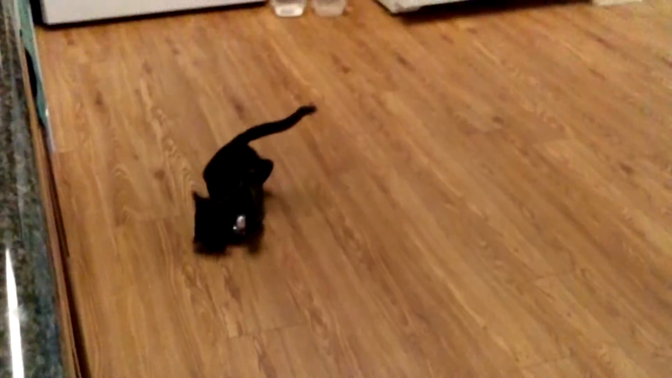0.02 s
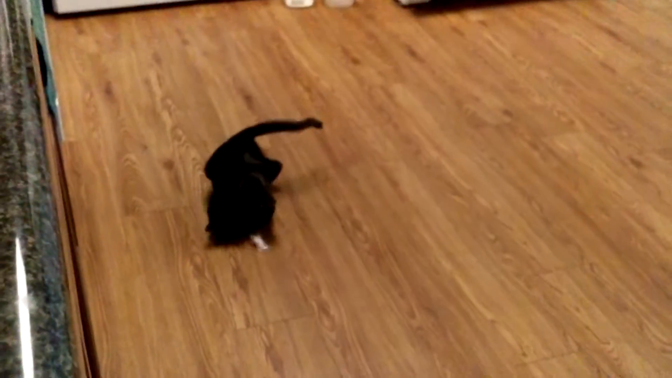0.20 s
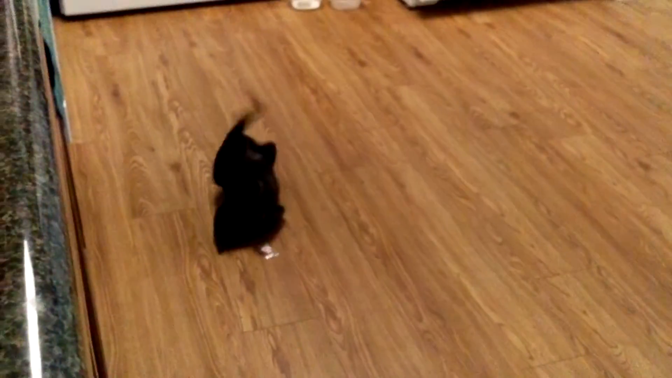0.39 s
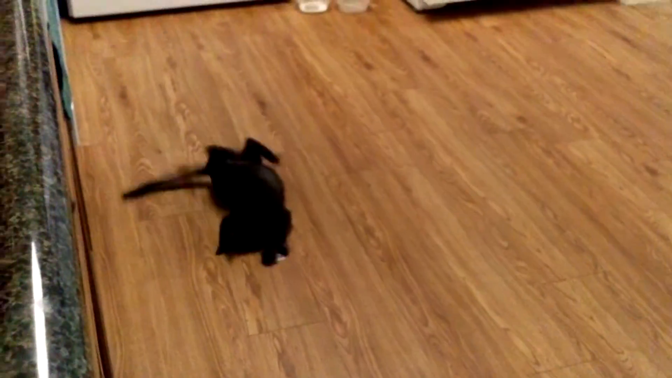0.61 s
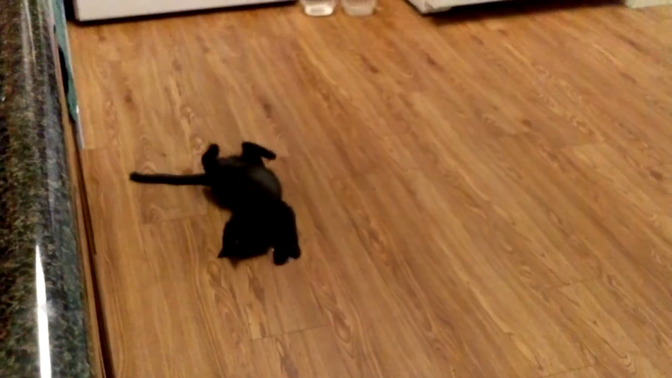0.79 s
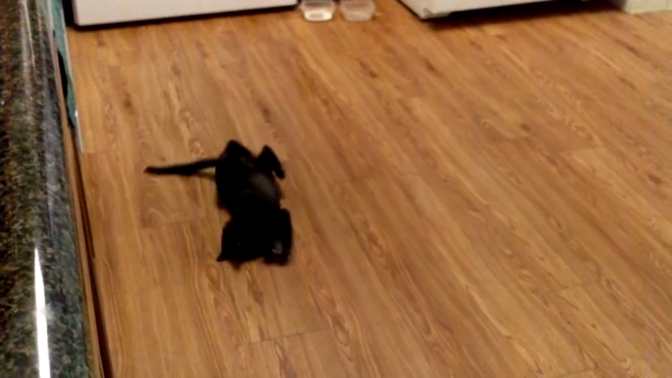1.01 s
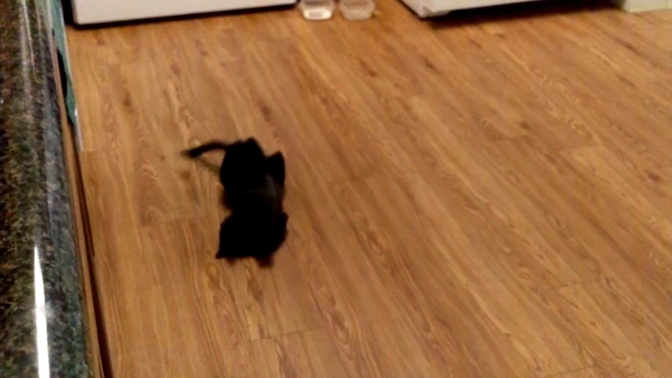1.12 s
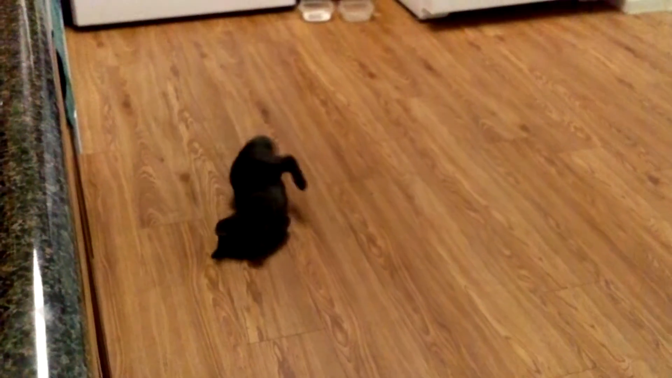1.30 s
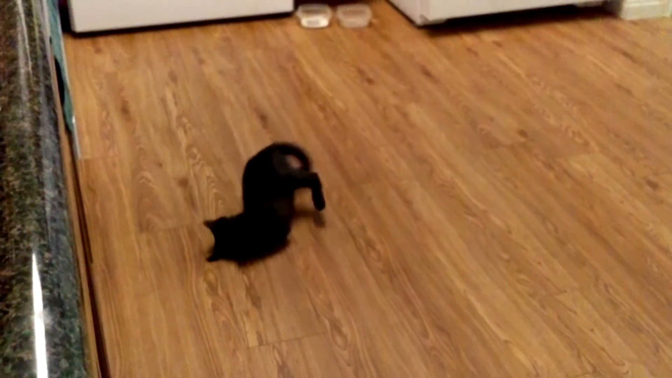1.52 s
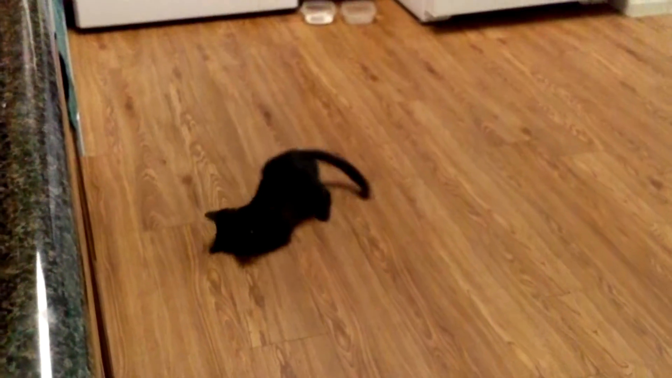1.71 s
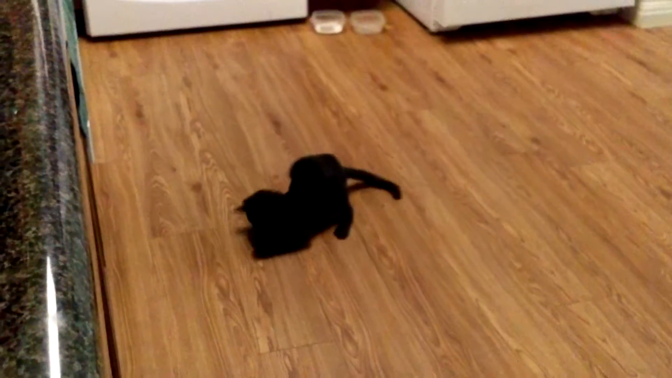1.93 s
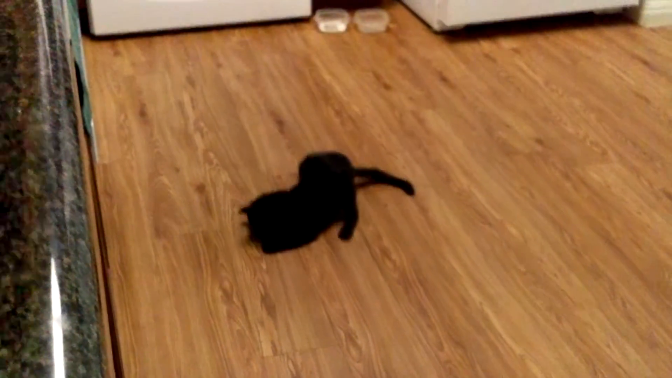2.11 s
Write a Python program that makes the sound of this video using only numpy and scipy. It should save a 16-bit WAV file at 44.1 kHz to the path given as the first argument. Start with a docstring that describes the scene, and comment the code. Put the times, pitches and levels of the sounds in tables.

```python
"""Wrapped sweet on a kitchen floor

Bare, echoing kitchen: a cat bats a hard sweet in a plastic wrapper over laminate, heard near and direct. The
sweet knocks as bright clicks over decaying modes; clicks of lower pitch are the cat's paws tapping. The wrapper
snaps as short clicks and crinkles in bursts of tiny random grains; hard walls add a noise tail. A fridge-like
murmur of shaped noise lies beneath; the microphone rounds peaks and dulls the top."""
import sys
import numpy as np
from scipy import signal
from scipy.fft import rfft, irfft
from scipy.io import wavfile
from scipy.ndimage import uniform_filter1d

SR = 44100
rng = np.random.default_rng(int(sys.argv[2]) if len(sys.argv) > 2 else 0)


def dump(signal):
    """Clip the signal to [-1, 1] and save it as 16-bit WAV at the path in sys.argv[1]."""
    limited = np.clip(np.atleast_2d(signal).T, -1, 1)
    pcm = np.round(limited * 32767).astype(np.int16)
    wavfile.write(sys.argv[1], SR, pcm)


N = 97020  # samples, 2.2 s

# murmur of the house, relative spectrum: f/Hz, density/dB (per Hz)
MURMUR_SPECTRUM = [(15, -30), (25, -10), (158, -7.5), (204, -7), (249, -4.5), (374, -5.5), (619, -6),
                   (928, -8.5), (1030, -4.5), (1140, -12.5), (1540, -8.5), (2420, -22), (10500, -12),
                   (13600, -42), (22000, -120)]
MURMUR_DB, MURMUR_FLICKER_DB = -54.5, 2.
# wavering tones in the murmur: f/Hz, width/Hz, level/dB
MURMUR_TONES = [(291.4, 47, -65), (634.4, 22.5, -70), (102.8, 24, -74.5)]

# crumpling of the wrapper, one table per burst:
# t/s, crinkle gain/dB, mid rustle/dB (re crinkle), low crackle/dB (re crinkle)
CRUMPLE_BURSTS = [
    [(0.0, -50, 0.5, -0.5), (0.072, -51.5, -6, -5.5), (0.08, -41.5, -6.5, -7.5), (0.17, -56.5, 5, -3),
     (0.202, -35.5, -8.5, -12), (0.222, -47.5, 3.5, -32)],
    [(0.245, -21.5, 0, -5.5), (0.347, -37.5, -1.5, 1), (0.501, -49.5, 2, 0.5), (0.585, -74, 15, 6)],
    [(0.612, -37, -1, -8), (0.632, -38, -13, -13), (0.678, -41.5, -2.5, -6.5)],
    [(0.7, -32.5, -8, -9.5), (0.852, -56.5, -4.5, -7), (0.87, -47.5, 5.5, -8.5)],
    [(0.885, -40, -5, -16), (0.993, -49.5, -2, -12.5), (1.161, -31, -10, -14), (1.219, -47.5, -5, -17),
     (1.25, -43, -8.5, -7.5)],
    [(1.275, -39.5, -9.5, -14), (1.405, -48, -2.5, -13), (1.463, -49, -10, -13), (1.561, -71.5, 6, 6),
     (1.689, -60, -2, -1.5), (1.86, -59.5, -1, -8.5)],
    [(1.89, -48, -4.5, -8), (2.012, -51.5, -5, -19), (2.032, -45, -18, -8), (2.038, -51, -14, -23),
     (2.048, -61, -12, -8), (2.055, -44, -7, -10)],
    [(2.08, -36.5, -15, -7.5), (2.142, -48.5, -2, -21)],
    [(2.157, -39, -4, -7.5), (2.187, -48.5, -6, -7), (2.2, -42, -4, -12)],
]
# where the second and later bursts begin: t/s
BURST_STARTS = [.2305, .598, .684, .878, 1.256, 1.872, 2.064, 2.149]
# the three ranges of film noise, bands weighed within each range: f/Hz, width/Hz, relative gain/dB
CRINKLE_BANDS = [(9500, 3000, 5.5)]
RUSTLE_BANDS = [(6370, 3420, 0)]
CRACKLE_BANDS = [(1250, 306, -1.5), (3020, 3560, 19.5)]
GRAINS_PER_S, GRAIN_SCATTER_DB, GRAIN_LEVEL_DB = 2500, 3, -3

# room tail by octave, level before a tilt towards the treble: f/Hz, level/dB, t60/s
ROOM_OCTAVES = [(324, -23, 0.27), (697, 0.5, 0.82), (1380, -2.5, 0.77), (3020, 6.5, 0.31),
                (4870, -1.5, 0.23), (8200, 1.5, 0.32)]
ROOM_DB, ROOM_ONSET_S, PATCHY_DB = -3.5, 0.0013, 4
KNOCK_ROOM_DB, TICK_ROOM_DB, TAP_ROOM_DB = -2.5, -2, -7  # sends into the room

# single folds of the wrapper snap: t/s (.0006 s ahead of the click), peak level/dB, f/Hz, length/cycles
FOLDS = [(0.0504, -35, 6960, 3), (0.0538, -33, 6650, 3), (0.0754, -32, 7420, 3), (0.0792, -27, 8210, 3),
         (0.0824, -29, 8910, 3), (0.0984, -32, 8440, 3), (0.1014, -32, 8160, 3), (0.1256, -29, 7380, 3),
         (0.183, -28, 8210, 3), (0.6035, -17, 9740, 3), (0.6074, -23, 8870, 3), (0.6224, -25, 9900, 3),
         (0.6843, -20, 9670, 3), (0.6954, -22, 9860, 3), (0.856, -20, 8860, 3), (1.038, -31, 9340, 3),
         (1.0565, -28, 8760, 3), (1.0789, -22, 9450, 3), (1.1248, -23, 9160, 3), (1.1394, -23, 9020, 3),
         (1.256, -20, 9030, 3), (1.2674, -26, 9040, 3), (1.3089, -27, 9830, 3), (1.3379, -24, 8670, 3),
         (1.3882, -32, 6620, 3), (1.4044, -32, 8120, 3), (1.4254, -34, 9680, 3), (1.4354, -36, 8440, 3),
         (1.6008, -38, 7810, 3), (1.6944, -41, 9920, 3), (1.7928, -36, 9780, 3), (1.8108, -40, 9860, 3),
         (1.8721, -32, 9420, 3), (1.8764, -35, 7890, 3), (1.8834, -36, 8530, 3), (2.0684, -29, 6890, 3),
         (2.0727, -22, 10000, 3), (2.1495, -27, 9870, 3)]
# the same folds with the start of each click as t/s
FOLD_TICKS = [(s + .0006, db, hz, cycles) for s, db, hz, cycles in FOLDS]

# the sweet strikes the floor: t/s, click peak level/dB, click f/Hz, body gain/dB, slap gain/dB (re click)
FLOOR_KNOCKS = [(.2292, -.5, 6200, -22, -28), (.2334, -2.5, 6200, -22, -37), (.3192, -3, 6200, -22, -90),
                (.2365, -10, 6000, -16, -90), (.2480, -16, 5600, -20, -90), (.2655, -16, 5500, -20, -90),
                (.3155, -18, 6300, -14, -90), (.3224, -17, 5200, -20, -90), (.5998, -27, 5000, -10, -90),
                (.6045, -24, 5500, -20, -90), (.6925, -24, 5500, -12, -90), (.8788, -22, 7200, -20, -90),
                (2.0655, -23, 6800, -10, -90), (2.1500, -32, 5000, -12, -90)]
# what sweet and board ring with, before random spread: f/Hz, gain/dB, t60/s
BODY_MODES = [(600, -8, .01), (1100, -2, .007), (1900, 0, .006), (2700, 0, .004), (3800, -3, .002)]
KNOCK_CYCLES, SPIKE_DB, SLAP_DECAY_S = 1.32, 21, 0.00097  # overload spike re slap; slap time constant

# the cat's paws tapping the floor: t/s, peak level/dB, f/Hz
PAW_TAPS = [(0.315, -37, 1110), (0.325, -30, 1004), (.690, -35.5, 1180), (0.699, -33, 1280),
            (0.709, -34.5, 1250), (0.718, -34, 1220), (0.726, -39.5, 1260), (0.706, -36, 2470),
            (0.719, -41, 2550), (.735, -37, 2430), (2.158, -48.5, 825)]
TAP_CYCLES = 2.85
CLICK_LOW_HZ = 700  # highest low cut of any click

CEILING = 1.1  # amplitude the microphone approaches but never passes
MIC_TOP_HZ, TOP_HZ = 10247, 16900  # roll-offs of microphone and recorder
IMAGE_HZ, IMAGE_WIDTH_HZ, IMAGE_DB = 11860, 670, -25  # faint mirror image of the treble, left by sampling


def undb(db):
    """Decibels to an amplitude factor."""
    return 10 ** (np.asarray(db) / 20)


def level(x, db):
    """Scale x to an RMS level in dB."""
    return x * undb(db) / np.sqrt(np.mean(x ** 2))


def band(x, hz, width_hz):
    """Two-pole-pair band-pass, its edges kept within reach."""
    low = max(hz - width_hz / 2, hz / 4)
    high = min(hz + width_hz / 2, SR / 2.2)
    return signal.sosfilt(signal.butter(N=2, Wn=[low, high], btype="band", fs=SR, output="sos"), x)


def walk(rate):
    """Random levels that slide to a new value rate times a second; spread near 1."""
    step = int(SR / rate)
    held = np.repeat(rng.standard_normal(N // step + 1), step)
    return uniform_filter1d(held, step)[:N]


def add(out, s, x):
    """Mix x in at s seconds."""
    i = int(s * SR)
    out[i:i + len(x)] += x[:N - i]


def click(hz, cycles):
    """A short oscillation that swells and dies away, freed of low rumble; peak 1."""
    turns = np.arange(int(SR * .03)) / SR * hz
    swell = turns * np.exp(-2 * turns / max(cycles, .5))
    x = swell * np.sin(2 * np.pi * turns)
    low_cut = signal.butter(N=2, Wn=min(CLICK_LOW_HZ, hz / 3), btype="high", fs=SR, output="sos")
    x = signal.sosfilt(low_cut, x)
    return x / np.abs(x).max()


def murmur():
    """Steady murmur of the house: shaped noise, each octave flickering a little on its own."""
    f = np.maximum(np.arange(N // 2 + 1) * SR / N, 1)
    shape_hz, shape_db = np.array(MURMUR_SPECTRUM).T
    shape = undb(np.interp(np.log(f), np.log(shape_hz), shape_db))
    spectrum = rfft(rng.standard_normal(N)) * shape
    octave = np.clip(np.round(np.log2(f / 60)), 0, 8)
    out = np.zeros(N)
    for k in range(9):
        out += irfft(spectrum * (octave == k), N) * undb(MURMUR_FLICKER_DB * walk(11.5))
    return level(out, MURMUR_DB)


def murmur_tones():
    """Narrow bands of noise that waver like a distant motor."""
    return sum(level(band(rng.standard_normal(N), f, width), db) for f, width, db in MURMUR_TONES)


def wrapper():
    """Crumpled film: tiny random clicks in three ranges, their levels jumping at each new burst."""
    out, t = np.zeros(N), np.arange(N) / SR
    burst = np.searchsorted(BURST_STARTS, t)

    def course(column):
        paths = []
        for table in CRUMPLE_BURSTS:
            columns = np.array(table).T
            paths.append(np.interp(t, columns[0], columns[column]))
        return np.choose(burst, paths)

    top, mid, low = course(1), course(2), course(3)
    for bands, db in ((CRINKLE_BANDS, top), (RUSTLE_BANDS, top + mid), (CRACKLE_BANDS, top + low)):
        chance, strength, side = rng.random((3, N))
        # mostly weak grains, a few much stronger; either polarity
        size = undb(-GRAIN_SCATTER_DB * np.log(1 - .99 * strength)) * np.sign(side - .5)
        grains = (chance < GRAINS_PER_S / SR) * size
        noise = sum(undb(gain) * band(grains, f, width) for f, width, gain in bands)
        out += undb(db) * level(noise, GRAIN_LEVEL_DB)
    return out


def room(x):
    """Hard walls: a patchy noise tail, each octave with its own decay."""
    t = np.arange(SR) / SR
    tail = np.zeros(SR)
    for f, db, t60 in ROOM_OCTAVES:
        noise = level(band(rng.standard_normal(SR), f, f * .75), db)
        tail += noise * np.sqrt(f / 5000.) * undb(-60 * t / t60)
    onset = 1 - np.exp(-t / ROOM_ONSET_S)
    tail = tail * onset * undb(PATCHY_DB * walk(600)[:SR])
    tail = tail / np.sqrt(np.sum(tail ** 2))  # unit energy
    return undb(ROOM_DB) * signal.fftconvolve(x, tail)[:N]


def ticks():
    """Single folds of the film snap as short clicks."""
    out = np.zeros(N)
    for s, db, hz, cycles in FOLD_TICKS:
        add(out, s, undb(db) * click(hz, cycles))
    return out


def knocks():
    """Bright click, ringing body, short push of air; the overload spike of the loudest hits is returned apart."""
    out, spike, t = np.zeros(N), np.zeros(N), np.arange(SR // 20) / SR
    spread = rng.standard_normal((len(FLOOR_KNOCKS), len(BODY_MODES)))
    for (s, db, hz, body_db, slap_db), mode_spread in zip(FLOOR_KNOCKS, spread):
        body = np.zeros(len(t))
        for (f, gain, t60), j in zip(BODY_MODES, mode_spread):
            # every knock varies the mode's loudness and pitch together
            ring = np.sin(2 * np.pi * f * (1 + .08 * j) * t)
            body += undb(gain + 2 * j) * ring * undb(-60 * t / t60)
        body = undb(body_db) * band(body, 2260.0, 4000.)
        slap = undb(slap_db) * np.exp(-t / SLAP_DECAY_S)
        add(out, s, undb(db) * (body + slap))
        add(out, s, undb(db) * click(hz, KNOCK_CYCLES))
        # one click cycle later, two opposite samples; next to nothing where the slap is -90 dB
        add(spike, s + 1 / hz, undb(db + slap_db + SPIKE_DB) * np.array([1., -1.]))
    return out, spike


def taps():
    """Paw taps on the floor: clicks of lower pitch."""
    out = np.zeros(N)
    for s, db, hz in PAW_TAPS:
        add(out, s, undb(db) * click(hz, TAP_CYCLES))
    return out


def microphone(near, spike):
    """Loud peaks rounded, top dulled; above it a faint mirror image of the treble and overload spikes."""
    near = near / (1 + np.abs(near / CEILING) ** 4) ** .25
    dull = signal.sosfilt(signal.ellip(N=8, rp=.5, rs=60, Wn=MIC_TOP_HZ, fs=SR, output="sos"), near)
    # the image is drawn as noise that follows the strength of the treble
    treble = np.sqrt(uniform_filter1d(band(near, 9500., 2000.) ** 2, size=40).clip(0))
    image = level(band(rng.standard_normal(N), IMAGE_HZ, IMAGE_WIDTH_HZ), 0) * treble
    image = band(band(image, IMAGE_HZ, IMAGE_WIDTH_HZ), IMAGE_HZ, IMAGE_WIDTH_HZ)
    return dull + undb(IMAGE_DB) * image + band(spike, 10800.0, 6000.)


def scene():
    """Floor and wrapper heard direct and through the room, over the murmur, at the microphone."""
    hits, spike = knocks()
    snaps, film, hollow = ticks(), wrapper(), taps()
    sent = undb(KNOCK_ROOM_DB) * hits + undb(TICK_ROOM_DB) * snaps
    sent = sent + undb(TAP_ROOM_DB) * hollow + film
    near = hits + snaps + film + hollow + room(sent) + murmur() + murmur_tones()
    return microphone(near, spike)[None]


def record(dry):
    """The recorder cuts the top."""
    return signal.sosfilt(signal.ellip(10, .2, 70, TOP_HZ, fs=SR, output="sos"), dry)


dry = scene()
out = record(dry)
dump(out)
```